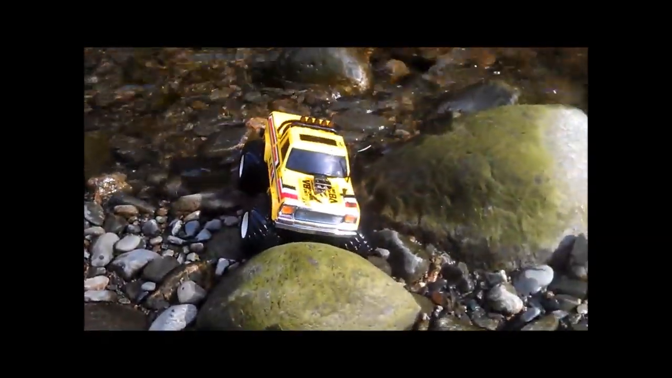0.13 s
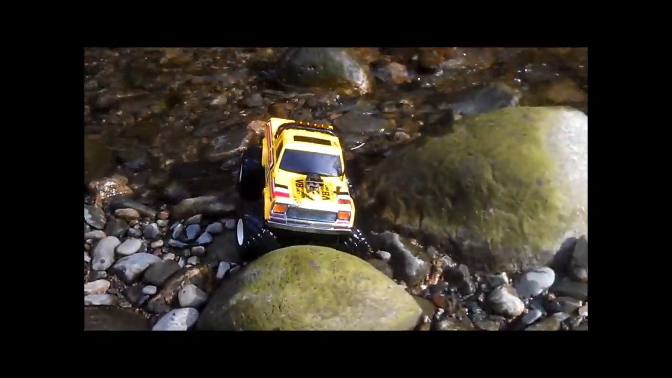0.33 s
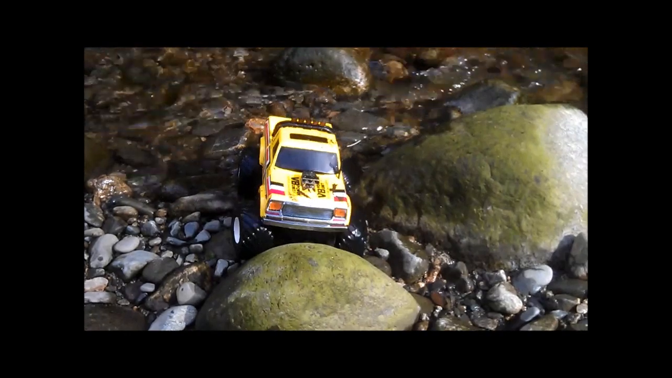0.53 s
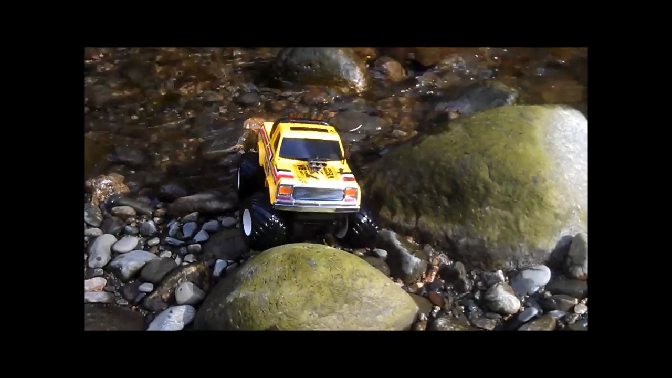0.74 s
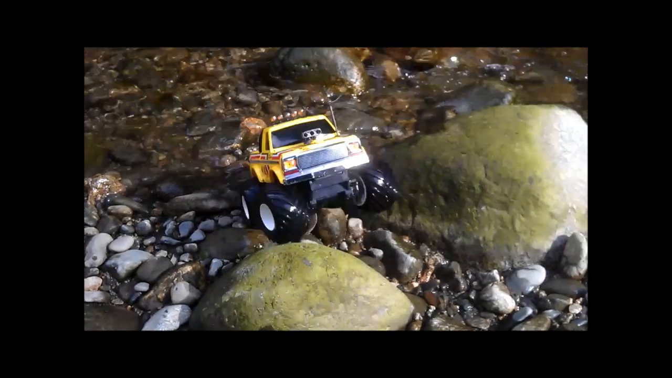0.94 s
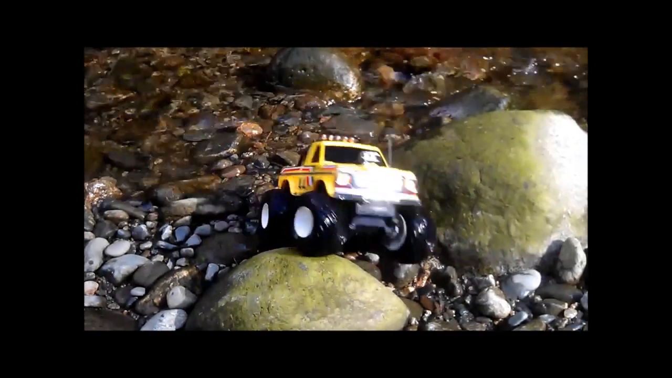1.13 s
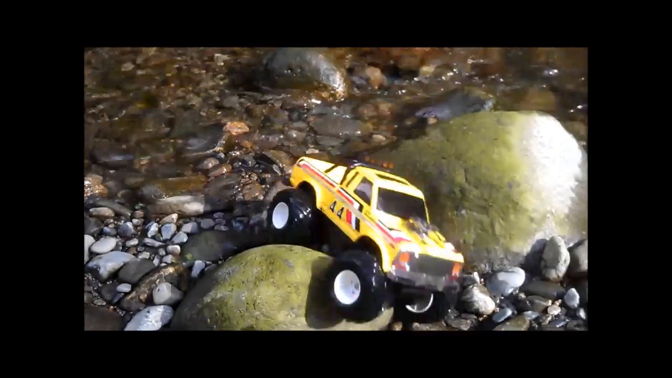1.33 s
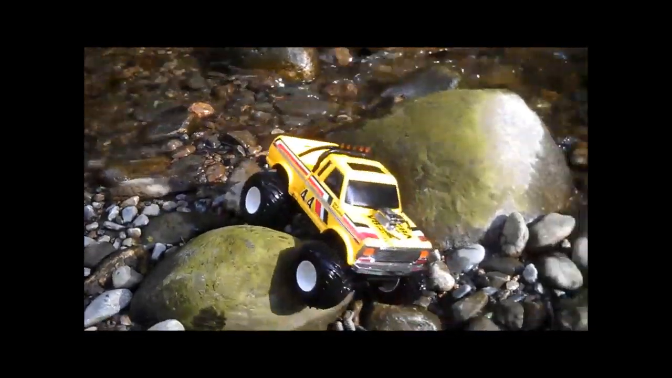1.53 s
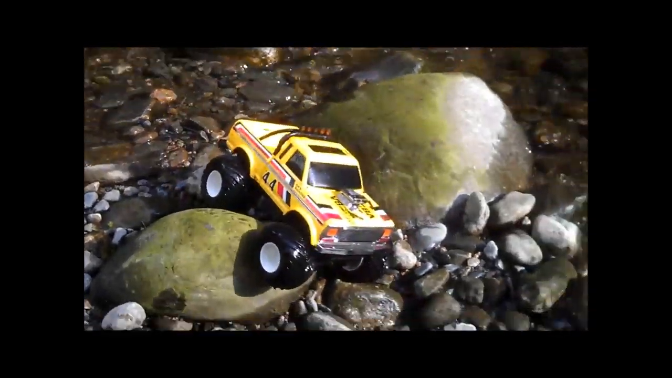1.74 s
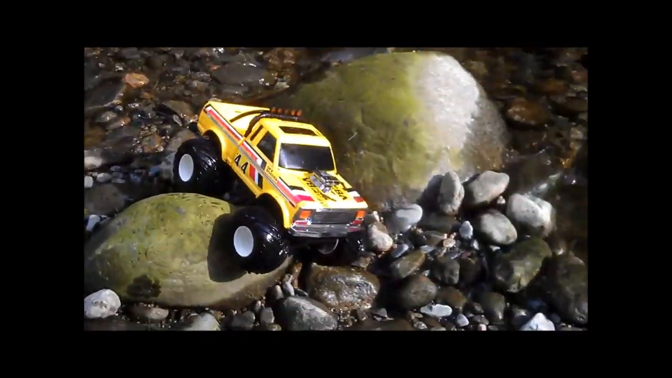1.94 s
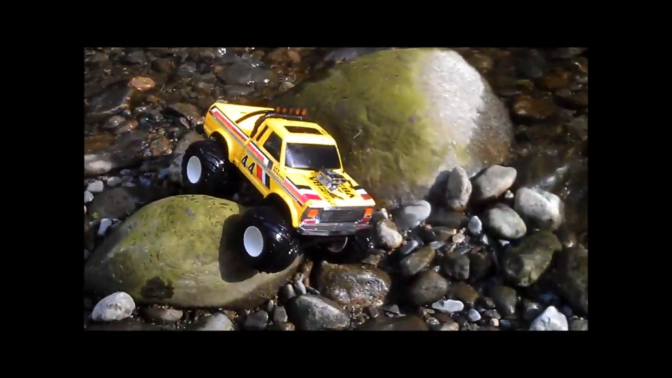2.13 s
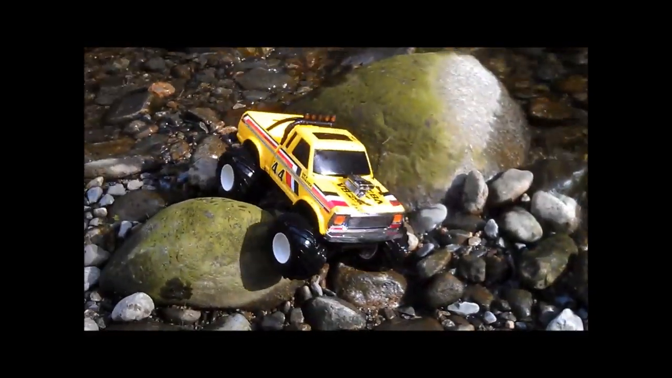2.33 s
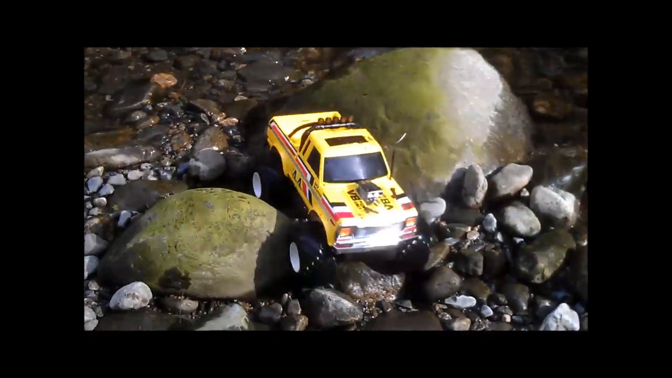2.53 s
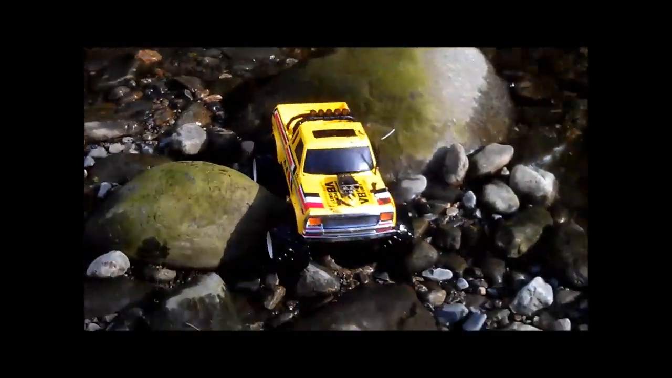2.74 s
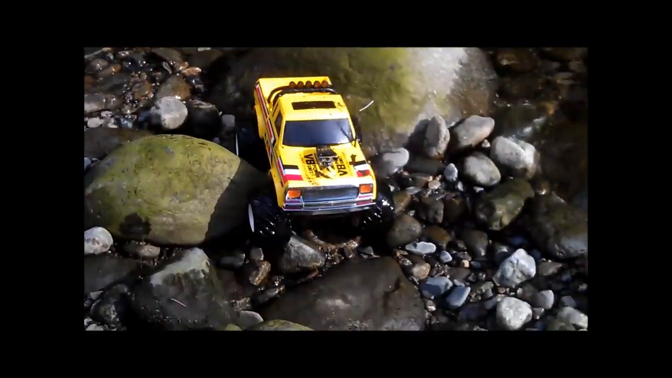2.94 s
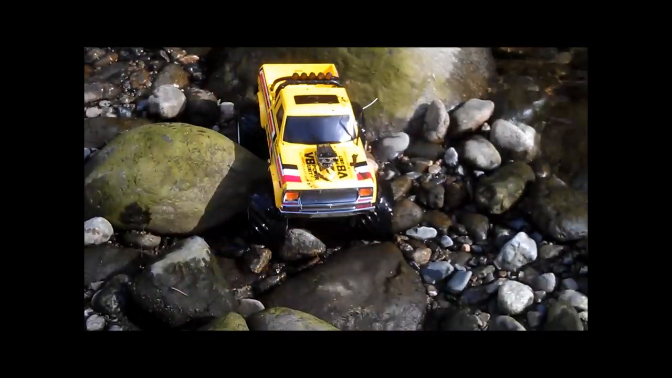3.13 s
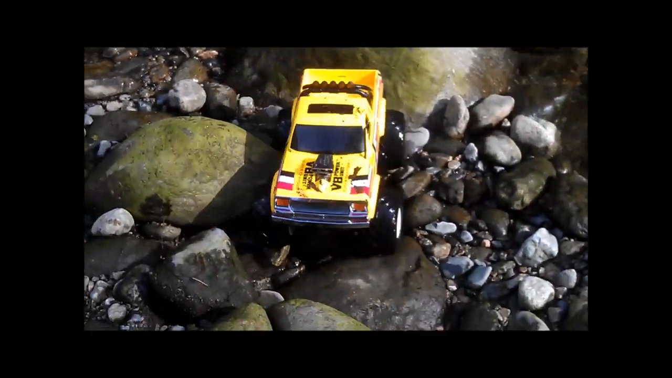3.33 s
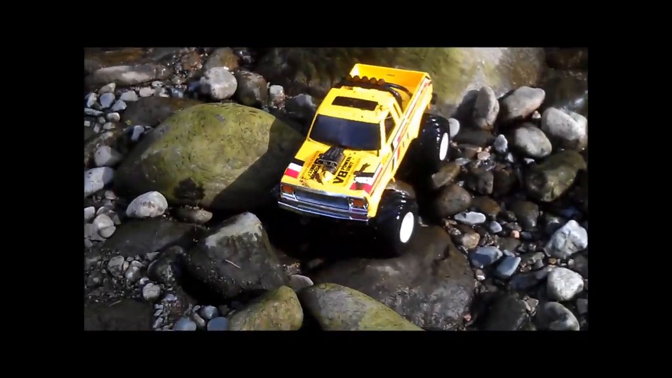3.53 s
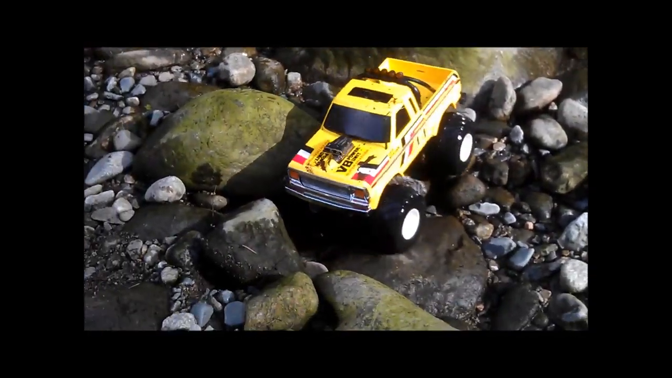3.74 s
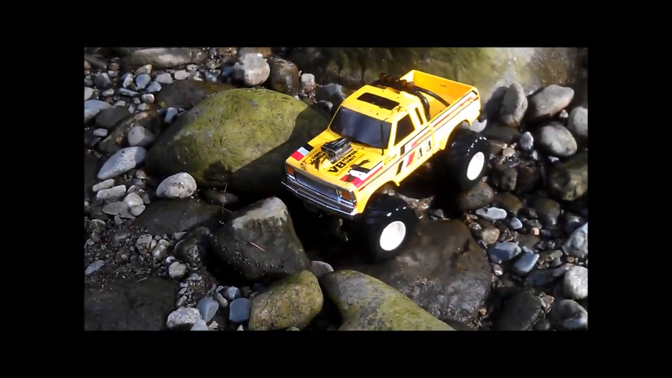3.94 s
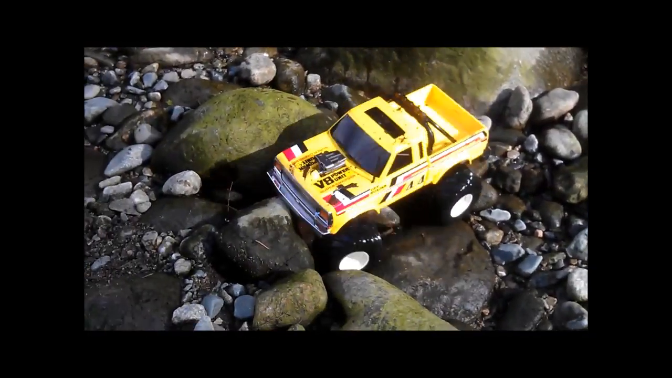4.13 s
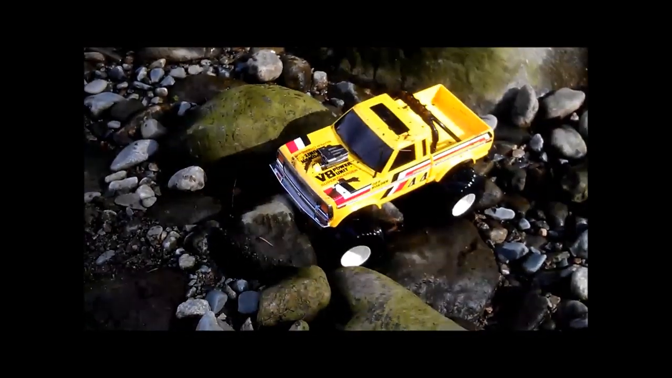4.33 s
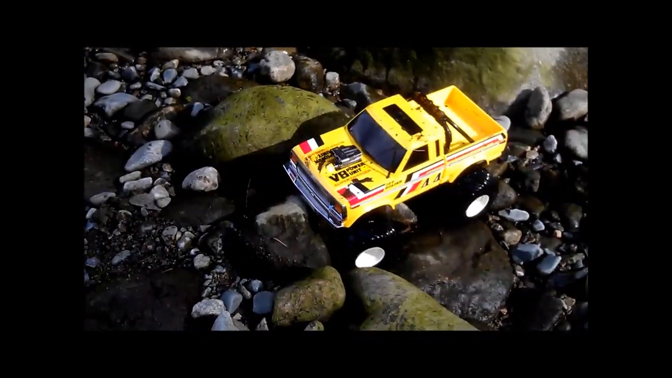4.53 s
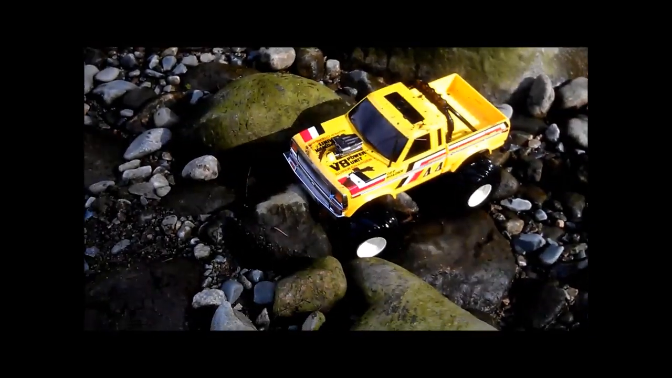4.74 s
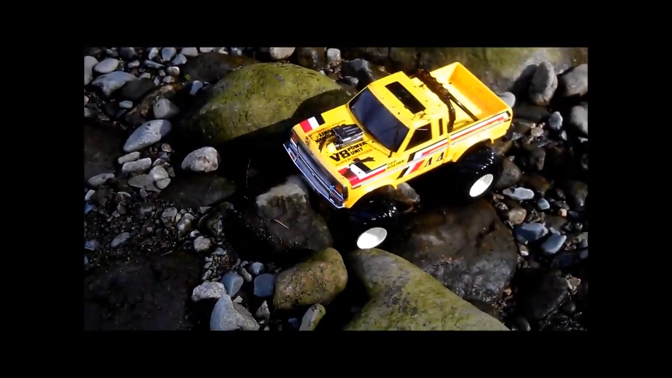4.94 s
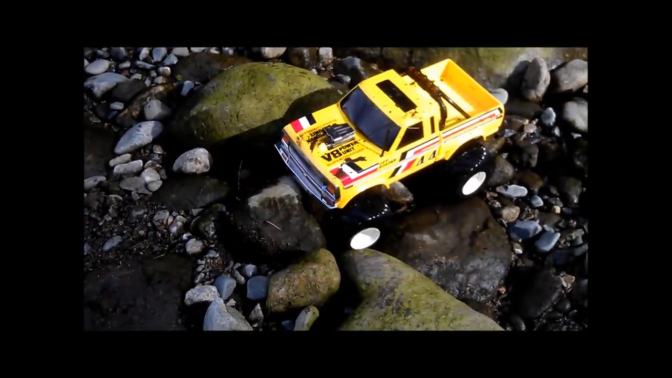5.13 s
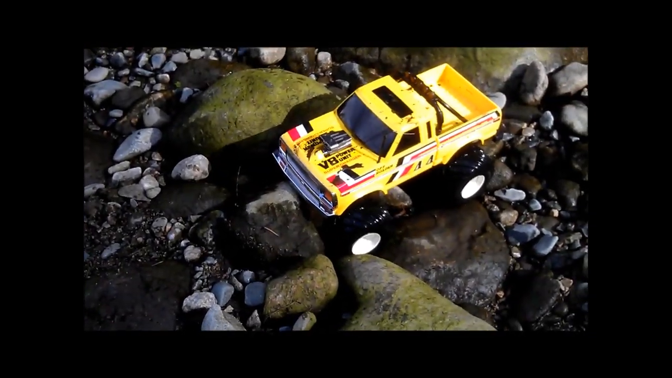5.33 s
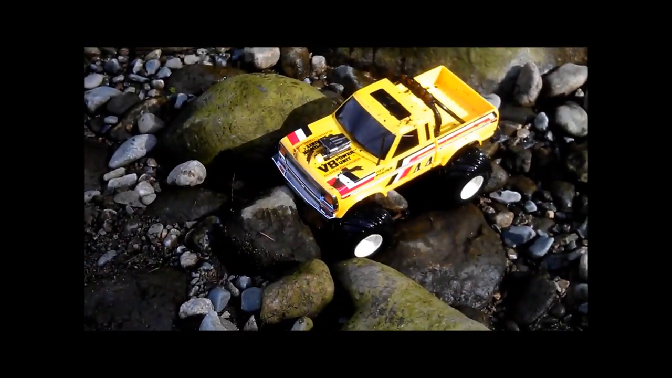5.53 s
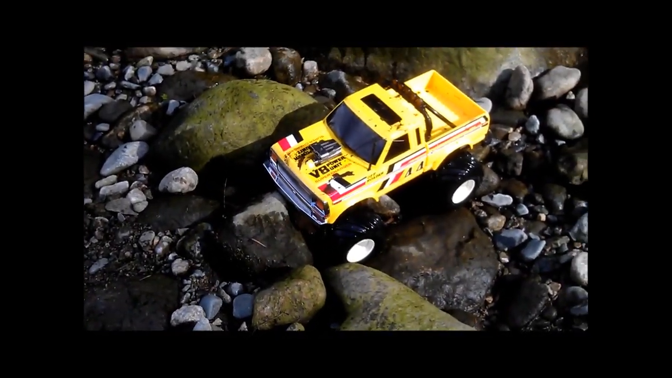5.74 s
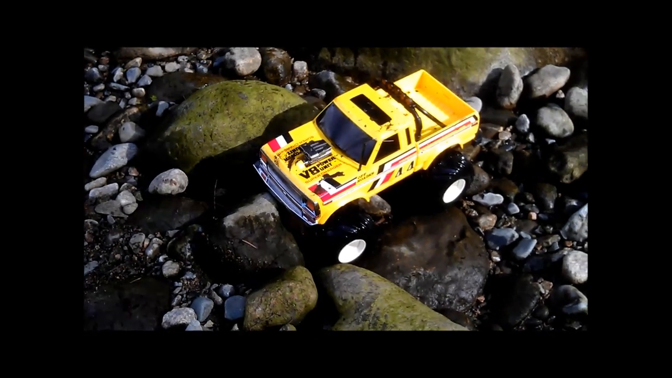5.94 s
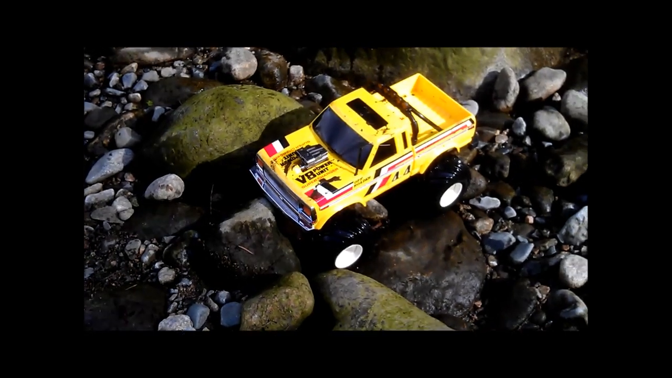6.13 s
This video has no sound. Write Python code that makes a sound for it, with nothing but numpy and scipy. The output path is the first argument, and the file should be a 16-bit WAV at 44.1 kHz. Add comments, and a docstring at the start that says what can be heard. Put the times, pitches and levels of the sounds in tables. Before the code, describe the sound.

Close stuttering gear whine and plastic rattle of a small radio-controlled truck, with stone knocks, brief pauses of creek water, and a squeak at the stop.

```python
"""Whining, rattling bursts of a toy crawler truck on wet stones, over a creek and far birds; stereo, close.
Gear teeth whine at the mesh rate, and their impacts ring the casing, cover and motor can in throbs.
Tyres scrabble as grainy noise and knock on stone as fading noise; a short gliding squeak marks the stop.
The creek is flickering bands of noise plus gliding bubbles; the birds are short near-sine slurs.
Creek, birds and squeak are heard fainter while the truck is loud."""
import sys
import numpy as np
from scipy import signal
from scipy.fft import rfft, irfft, next_fast_len
from scipy.io import wavfile
from scipy.ndimage import uniform_filter1d

SR = 44100
rng = np.random.default_rng(int(sys.argv[2]) if len(sys.argv) > 2 else 0)


def persist_wave(psi):
    """Save psi, clipped to +-1, as 16-bit WAV."""
    counts = np.round(np.clip(psi, -1, 1) * 32767).astype(np.int16)
    wavfile.write(sys.argv[1], SR, np.atleast_2d(counts).T)


N = 277389
T = np.arange(N) / SR
GEAR_TEETH, PINION_TEETH = 44, 13

# gear mesh, one table a pull of the throttle: time_s, mesh_hz, tooth_force_db,
# even_overtones_db and third_overtone_db (both over the tooth force)
MESH_PULLS = [
    [(.478, 1170, -14, -10, -13), (.51, 1284, -13, -16, -19), (.55, 1500, -17, -11, -21),
     (.595, 1330, -22, -30, -28), (.63, 1501, -24, -10, -20), (.68, 1500, -22.5, -10, -14),
     (.718, 1390, -27, -12, -16), (.77, 1569, -24, -5, -13.5), (.88, 1529, -22.5, -10, -15),
     (.95, 1721, -25.5, -6.5, -20), (1.01, 1750, -31.5, 6, -17), (1.07, 1814, -31, 0.5, -11),
     (1.15, 2030, -20.5, -12.5, -7), (1.215, 1936, -28.5, -9, -21)],
    [(1.255, 1800, -27, -5, -12), (1.292, 1380, -24.5, -5, -11)],
    [(1.33, 2200, -23, -11, -14), (1.352, 2020, -38.5, 3, -14), (1.366, 2207, -28, -15, -16),
     (1.395, 1870, -31, -3, -20)],
    [(2.35, 800, -29, 5, -17), (2.41, 1120, -23, 1.5, -3), (2.46, 1355, -26, -8, -29),
     (2.51, 1500, -22, -6, -14), (2.55, 1690, -25, -16, -20), (2.585, 1661, -18, -13, -16),
     (2.612, 1340, -20.5, -13, -7)],
    [(2.711, 1599, -9.5, -1, -17), (2.742, 1290, -24, -7, -9)],
    [(2.865, 1646, -29, -1, -14), (2.89, 1650, -20, -13, -19)],
    [(3.19, 1598, -16, -6, -24), (3.24, 1464, -27, -5, -8)],
    [(3.32, 1130, -33, 2, -6), (3.36, 1260, -21.5, -17, -2), (3.41, 1138, -31, -15, -15),
     (3.445, 1450, -31, 1, 0.5), (3.48, 1200, -25.5, -14, -1.5), (3.57, 1000, -30.5, -14, -14),
     (3.63, 800, -33.5, 4, -4), (3.7, 618.6, -30, -6, -18), (3.85, 636.4, -34.5, -6, 5),
     (3.97, 860, -37.5, -1.5, -8), (4.17, 860, -35.5, 7, -3), (4.27, 1252, -26.5, -5, -6)],
    [(4.315, 1724, -20, -21, -13), (4.37, 1400, -28, -2, -12), (4.49, 1310, -29, -4, -15),
     (4.55, 1201, -35.5, 5, -8), (4.6, 1099, -34, 1, -10), (4.66, 1048, -28, -2, -8),
     (4.77, 1015, -27, -4, -7), (4.84, 950, -32.5, 3, -3), (4.94, 900, -35, 9.5, 2),
     (5.0, 1040, -22.5, -4, -12), (5.05, 1331, -26.5, 0, -5.5), (5.12, 1611, -27, -18, -3),
     (5.17, 1800, -23, -16, -9), (5.2, 1885, -23, -3.5, -16), (5.29, 1986, -24.5, -10, -16),
     (5.37, 1450, -37, -18, -14)],
]
# how well the gearbox radiates a tone: pitch_hz, gain_db
GEARBOX_RADIATION = [(600, 2), (1000, -8), (1500, 0.5), (1780, -1.5), (2000, -0.5), (2400, 6), (3000, -11),
                     (3600, 0), (4050, 5), (4450, 3.5), (4850, -6.5), (5500, -3), (6200, -35)]
# motor tones at two and four thirds of the mesh rate: level_db over the tooth force
MOTOR_TONES_DB = [-9, -16]
FOURTH_DB = -14  # fourth overtone over the second


def whine(throb):
    """Tooth mesh tone with harmonics that blur the higher they lie, coloured by the gearbox."""
    (hz, force_db, even_db, third_db), on = played(MESH_PULLS)
    # slow, loaded teeth grind and flutter; fast, free ones sing
    clean = np.clip((hz - 850) / 950, .4, .85)
    rough = 1 - clean
    flutter = rough * (.022 * walk(40) + .03 * walk(200))
    turn = 2 * np.pi * np.cumsum(hz * (1 + flutter)) / SR
    noise = rng.standard_normal(N)

    mesh = 0.85 * np.sqrt(clean) * np.sin(turn) + 1.05 * rough * narrow(noise, turn, 140.)
    out = undb(2.5 * walk(60)) * mesh
    # an off-centre big gear swells the mesh tone once a turn
    out *= 1 + np.minimum(1.4 * rough, .45) * np.sin(turn / GEAR_TEETH + .8 * walk(12))

    second = 1.05 * clean ** 2 * np.sin(2 * turn)
    second += (1.05 - .6 * clean) * narrow(noise, 2 * turn, 220.)
    out += undb(even_db + 1.8 * walk(70)) * second
    third = .35 * clean * np.sin(3 * turn) + 1.05 * narrow(noise, 3 * turn, 330.)
    out += undb(third_db + 1.5 * walk(60)) * third
    out += undb(even_db + FOURTH_DB + 4 * walk(50)) * narrow(noise, 4 * turn, 260.)

    # the pinion chops tone and overtones into short beads
    out *= 1 + np.minimum(2.4 * rough, .7) * np.sin(turn / PINION_TEETH + 1.1 * walk(40))
    out = colour(out * undb(force_db), GEARBOX_RADIATION)

    # the motor tones hum loudest near one speed
    hum = 1 + np.exp(-((hz - 1780) / 110) ** 2)
    for thirds, db in zip((2, 4), MOTOR_TONES_DB):
        motor = np.sin(thirds / 3 * turn)
        out += undb(force_db + db + 2 * walk(70)) * clean ** 4 * motor * hum
    return out * throb ** .6 * on


# louder throbs of the gear train, many in a regular run: time_s, level_db (relative)
LOUD_THROBS = [(.434, -9), (0.45, 0), (0.48, -2.5), (0.504, -5.5), (0.529, -11.5), (0.587, -13),
               (0.778, -17), (0.806, -17), (.84, -15), (1.044, -10.5), (1.079, -12), (1.368, -16),
               (2.351, -12), (2.391, -2.5), (2.416, -4), (2.498, -9), (2.593, -7.5), (2.733, -5.5),
               (2.854, -8), (2.877, -8.5), (3.226, -4), (3.261, -5.5), (3.35, -11), (3.448, -8),
               (3.638, -10), (3.759, -11), (3.82, -10.5), (3.87, -10.5), (3.92, -6), (3.961, -9),
               (4.007, -10.5), (4.133, -10.5), (4.244, -7.5), (4.269, -6), (4.34, -7.5), (4.416, -7),
               (4.476, -7), (4.509, -6.5), (4.539, -10), (4.57, -9), (4.602, -12), (4.632, -12.5),
               (4.664, -12), (4.7, -11.5), (4.74, -11.5), (4.783, -9.5), (4.823, -10.5), (4.872, -14),
               (4.915, -10), (4.989, -5), (5.057, -7.5)]
# throb once a turn of the big gear, over the steady rattle
TIGHT_SPOT_DB, TIGHT_SCATTER_DB = 3.5, 1.


def throbbing(rest_db, mesh_hz):
    """Rattle envelope: swells at big-gear turns and at timed louder throbs, fast up and slower down."""
    gear_turns = np.cumsum(mesh_hz * (1 + 0.04 * walk(20))) / SR / GEAR_TEETH
    turns = np.flatnonzero(np.diff(np.floor(gear_turns)))
    powers = np.zeros(N)
    scatter_db = TIGHT_SCATTER_DB * rng.standard_normal(len(turns))
    powers[turns] = undb(rest_db[turns] + TIGHT_SPOT_DB + scatter_db) ** 2
    for s, db in LOUD_THROBS:
        i = int((s - .009) * SR)
        powers[i - 900:i + 900] = 0  # a louder throb replaces the swells that start within 20 ms of it
        powers[i] = undb(db - 10.0) ** 2
    u = np.arange(int(.05 * SR)) / SR / .014  # the swell peaks after 14 ms
    swell = (u * np.exp(1 - u)) ** 6
    swells = np.abs(signal.fftconvolve(powers, swell)[:N])
    return np.sqrt(undb(rest_db) ** 2 + swells)


# rings of the casing: pitch_hz, width_hz, level_db (relative)
CASING_RINGS = [(1930, 1000, -5), (2023, 110, -9), (2357, 132, -7.5), (4400, 100, -12), (9300, 100, -44)]
# rings of the motor can: pitch_hz, width_hz
CAN_RINGS = [(7350, 240), (7770, 300)]
# how hard the can rings: time_s, level_db (relative)
CAN_STRENGTH = [(.45, -16), (.6, -13), (1.05, -15), (1.2, -24), (3.0, -20), (3.25, -19), (3.75, -20),
                (3.9, -12.5), (4.9, -14), (5.15, -5.5), (5.35, -12)]
# ring of the gear cover: time_s, pitch_hz, level_db (relative)
COVER_RING = [(.5, 3830, -9), (.59, 3830, -4.5), (.63, 3940, -9), (.9, 3850, -16), (1.3, 3860, -21),
              (1.37, 3750, -4), (1.42, 3900, -66), (2.33, 3680, -27), (2.355, 3647, -10), (2.75, 3690, -29),
              (3.25, 3810, -10), (3.4, 3810, -12), (3.52, 3740, -14), (3.58, 3795, -14),
              (3.72, 3820, -16.5), (4., 3830, -7.5), (4.55, 3904, -12), (4.62, 3910, -13), (4.7, 3920, -8),
              (4.88, 3887, -21), (5.04, 3900, -15.5), (5.16, 3808, -23), (5.4, 3900, -13),
              (5.44, 3900, -39)]
# broad hiss of the tooth impacts: pitch_hz, level_db (relative, per Hz)
IMPACT_HISS = [(1500, -65), (2500, -12), (4500, -11), (6500, -22), (9000, -24.5), (12000, -40.5),
               (15500, -114)]
LABOUR_DB_PER_KHZ = 4  # the casing rings harder as the gears slow under load
BRUSH_SPLIT_HZ, BRUSH_DB = 8760, 5.5  # lift of brush hiss and high rings above the split


def gearbox_rattle(env, throb, mesh_hz):
    """Tooth impacts ring the casing, motor can and gear cover over a broad hiss."""
    hits = grainy(.7, 900) * undb(1.5) * env
    ring = sum(undb(db) * band(hits, f - w / 2, f + w / 2) for f, w, db in CASING_RINGS)
    ring *= undb(LABOUR_DB_PER_KHZ * (1500 - mesh_hz) / 1000)
    can = sum(band(hits, f - w / 2, f + w / 2) for f, w in CAN_RINGS)
    ring += undb(np.interp(T, *np.transpose(CAN_STRENGTH))) * throb ** 0.85 * can
    # the gear cover flexes under load, so its ring shifts and breaks up
    (cover_hz, cover_db), _ = played([COVER_RING])
    turn = 2 * np.pi * np.cumsum(cover_hz * (1 + .007 * walk(90))) / SR
    cover = undb(cover_db + 1.5 * walk(50)) * throb ** .7 * narrow(hits, turn, 210.0)
    rattle = undb(2.5) * ring + cover + undb(7.5) * colour(hits, IMPACT_HISS)
    return rattle + (undb(BRUSH_DB) - 1) * band(rattle, BRUSH_SPLIT_HZ, 21000.0)


# tyre scrabble: pitch_hz, level_db (relative, per Hz)
TYRE_GRIT = [(50, -50), (120, -19.5), (250, -0.5), (500, 0.5), (800, 8.5), (1600, 4.5), (2500, -2.5),
             (4000, -45)]


def tyre_scrabble(grit_db, throb):
    """Tyres scrape wet stone: grainy noise that throbs slightly with the gears."""
    grit = level(colour(grainy(0.36, 500), TYRE_GRIT), -7.5)
    return grit * undb(grit_db) * throb ** 0.16


# load on the truck, one table a burst: time_s, steady_rattle_db, tyre_scrabble_db (both relative)
LOAD_BURSTS = [
    [(.38, -38, -36), (.44, -17, -15.5), (.594, -31, -35.5), (.93, -29.5, -32.5), (1.072, -23, -33),
     (1.194, -28.5, -33), (1.235, -30, -33)],
    [(1.245, -23.5, -27), (1.285, -30, -32), (1.305, -40, -37), (1.33, -28, -25), (1.5, -29.5, -25.5),
     (1.6, -32, -26.5), (2.1, -44, -35)],
    [(2.3, -46, -31), (2.36, -15.5, -19), (2.46, -22.5, -22), (2.52, -26, -27), (2.588, -20.5, -24.5),
     (2.635, -30, -35), (2.655, -48, -31), (2.685, -29, -28.5), (2.71, -30, -25), (2.93, -31, -31.5),
     (3.05, -44, -33)],
    [(3.12, -38, -32), (3.19, -17.5, -13.5), (3.35, -25, -27.5), (3.57, -28.5, -28.5), (3.84, -21.5, -21),
     (4.02, -24.5, -29), (4.8, -26, -32.5), (5.03, -22.5, -25.5), (5.12, -22.5, -36), (5.2, -24, -32.5),
     (5.31, -25.5, -41), (5.39, -39, -32)],
    [(5.43, -46, -51), (5.472, -26, -31.5), (5.62, -65, -32.5)],
]
TRUCK_PAN_DB = -1.5  # left over right


def truck():
    """Gear whine, gearbox rattle and tyre scrabble, burst by burst, slightly right of centre."""
    (rest_db, grit_db), on = played(LOAD_BURSTS)
    mesh_hz = played(MESH_PULLS)[0][0]
    env = throbbing(rest_db, mesh_hz)
    throb = env / uniform_filter1d(env, size=3000)
    rough = gearbox_rattle(env, throb, mesh_hz) + tyre_scrabble(grit_db, throb)
    sound = whine(throb) + rough * on
    return wide(sound, 0.98) * undb(np.array([[TRUCK_PAN_DB], [-TRUCK_PAN_DB]]) / 2)


# bumps of tyres and chassis on stone: start_s, level_db (relative), treble_db (crack over thud)
STONE_KNOCKS = [(0.45, -8, -3), (1.25, -30, -11), (1.456, -11.5, -8), (1.491, -30, -7),
                (1.517, -18.5, -4.5), (2.366, -7.5, -5), (2.71, -21.5, 0), (2.852, -10.5, -46),
                (2.913, -11.5, -11), (3.186, -7.5, -9), (3.702, -30, -20), (4.277, -19.5, -6),
                (5.487, -10.5, -3)]
# dull thud of the stones: pitch_hz, level_db (relative, per Hz)
STONE_THUD = [(40, 0), (120, -10), (400, 2), (900, 5.5), (1600, 3.5), (3000, -40)]
KNOCK_T60_S = 0.24


def knocks():
    """Each bump is a dull thud and a bright crack of noise, fading exponentially."""
    low, high = np.zeros(N), np.zeros(N)
    t = np.arange(int(.2 * SR)) / SR
    for s, db, treble_db in STONE_KNOCKS:
        i = int(s * SR)
        fade = (1 - np.exp(-t / 0.0012)) * undb(db - 12.5 - 60 * t / KNOCK_T60_S)
        low[i:i + len(t)] += fade
        high[i:i + len(t)] += fade * undb(treble_db)
    thud = level(colour(rng.standard_normal(N), STONE_THUD), 0) * low
    crack = level(band(rng.standard_normal(N), 2540.0, 9050.0), 0) * high
    return wide(thud, 0.87) + wide(crack, 0.73)


# squeak and bird slurs: start_s, length_s, pitch_hz, glide_octaves, level_db (relative)
SLURS = [(0.108, 0.031, 5480, -0.043, -39), (0.229, 0.048, 6950, 0., -45), (0.314, 0.025, 5600, .28, -45),
         (1.59, 0.029, 5350, 0.088, -36), (1.701, 0.078, 4480, -0.033, -52),
         (1.77, 0.047, 4930, 0.43, -38.5), (2.67, 0.067, 7100, -0.032, -32),
         (3.019, 0.16, 7970, -0.077, -89), (5.483, 0.03, 5230, -0.08, -24.5),
         (5.556, 0.056, 5670, -0.15, -37), (5.628, 0.034, 7100, -.1, -45), (5.819, .012, 4500, 0., -37.5),
         (5.852, 0.014, 4720, -0.2, -43), (5.88, .016, 4080, -0.027, -45),
         (5.899, 0.015, 4820, -0.22, -41.5), (5.935, 0.01, 4250, .24, -42), (6.072, 0.058, 7500, 0.11, -47),
         (6.2, 0.041, 5220, 0.22, -45)]
# the one short squeak as the truck stops, at 5.48 s: same columns
STOP_SQUEAK = SLURS[8:9]


def squeak():
    """A short squeak as the truck stops: one near-sine slur gliding slightly down."""
    return slurred(STOP_SQUEAK)


# rush of the creek: pitch_hz, level_db (relative, per Hz)
CREEK_RUSH = [(15, -81), (25, -51), (66, -106), (136, -37), (183, -5.5), (495, -6), (762, 0), (1080, -1.5),
              (1570, -8), (1850, -6), (3090, -13.5), (5580, -16), (9810, -21), (12500, -32.5),
              (15500, -126)]
# how alike the creek is on the two sides: pitch_hz, likeness (0 to 1)
SIDE_LIKENESS = [(60, .6), (130, 1), (300, 0.92), (700, 1), (1400, 0.1), (3000, 0.19), (15000, 0.2)]
CREEK_DB = -43  # rush at 200-450 Hz, before the ducking and the microphone


def creek():
    """Rush in flickering half-octave noise bands, bass alike on both sides, with gurgling bubbles."""
    rush, swell = 0, walk(1.0)
    for hz in 40 * 2 ** np.arange(1, 8.6, .5):
        mid, side = (band(grainy(0.76, 700), hz * 0.77, hz * 1.16) for _ in range(2))
        alike = np.clip(along(SIDE_LIKENESS, hz), 0, .99)
        gain = undb(0.2 * swell + 1.5 * walk(5.5))
        spread = np.sqrt(1 - alike) * side * np.array([[1], [-1]])
        rush = rush + gain * (np.sqrt(1 + alike) * mid + spread)
    rush = colour(rush, CREEK_RUSH)
    rush = rush / np.sqrt(np.mean(band(rush.mean(axis=0), 200., 450.) ** 2))
    bubbles = np.zeros(N + SR)
    for when, pitch, size in rng.random((900, 3)):
        hz, i = 500 * 2 ** (1.4 * pitch), int(when * N)
        t = np.arange(int(12 / hz * SR)) / SR
        # a bubble rings a few cycles and glides up
        tone = np.sin(2 * np.pi * hz * t * (1 + 0.0241 * hz * t))
        bubbles[i:i + len(t)] += undb(-14 * size) * np.exp(-t * hz / 5.4) * tone
    return (rush + wide(level(bubbles[:N], 0.32), 0.37)) * undb(CREEK_DB)


# far birds, all the slurs but the squeak: start_s, length_s, pitch_hz, glide_octaves, level_db (relative)
BIRD_NOTES = SLURS[:8] + SLURS[9:]


def birds():
    """Far birds twitter in short near-sine slurs, most gliding through their pitch."""
    return slurred(BIRD_NOTES)


def slurred(notes):
    """Near-sine slurs under rounded envelopes, with a fluttering level."""
    out = np.zeros(N)
    for s, length, hz, octaves, db in notes:
        i, u = int(s * SR), np.linspace(-1, 1, int(length * SR))
        tone = np.sin(2 * np.pi * np.cumsum(hz * 2 ** (octaves * u / 2)) / SR)
        out[i:i + len(u)] += undb(db) * np.sqrt(1 - u ** 2) * tone
    return wide(out * undb(4.5 * walk(400)), .8)


def ducking(loud, knee_db, depth, hold_s):
    """Background gain: falls with the recent power of the loud sound, recovers when that stops."""
    keep = np.exp(-1 / (hold_s * SR))
    power = signal.lfilter([1 - keep], [1, -keep], np.mean(loud ** 2, axis=0))
    return (1 + power / undb(2 * knee_db)) ** -depth


def wide(x, share):
    """Stones and water scatter a share of the sound differently to each side, the treble most."""
    taps = rng.standard_normal(3000) * np.exp(-np.arange(3000) / 1000.)
    taps = signal.lfilter([1, -.6], [1], taps)
    side = share * signal.fftconvolve(x, taps / np.sqrt(np.sum(taps ** 2)))[:N]
    return np.array([x + side, x - side])


def narrow(x, turn, width_hz):
    """Noise squeezed into a line that follows the phase turn; rms near 1 for white x of rms 1."""
    sos = signal.butter(2, width_hz / 2, fs=SR, output="sos")
    slow = signal.sosfilt(sos, x * np.exp(-1j * turn)) * np.sqrt(SR / width_hz)
    return np.real(slow * np.exp(1j * turn))


def grainy(spike_db, per_s):
    """Noise whose loudness jumps grain by grain."""
    k = int(SR / per_s)
    sizes = undb(spike_db * rng.exponential(size=N // k + 1))
    return rng.standard_normal(N) * np.repeat(sizes, k)[:N]


def walk(rate):
    """Random levels held 1 / rate s and slewed twice; spread near 1."""
    k = int(SR / rate)
    steps = np.repeat(rng.standard_normal(N // k + 1), k)
    return 1.6 * uniform_filter1d(uniform_filter1d(steps, k), k)[:N]


def played(tables):
    """Columns of several tables sample by sample, and a gate that is open inside them."""
    rows = np.concatenate([np.array(table) for table in tables])
    on = sum((T > table[0][0]) & (T < table[-1][0]) for table in tables)
    return [np.interp(T, rows[:, 0], c) for c in rows.T[1:]], uniform_filter1d(1. * on, size=800)


def colour(x, table):
    """Shape a signal by (Hz, dB) points."""
    size = next_fast_len(N)
    gains = undb(along(table, np.fft.rfftfreq(size, 1 / SR)))
    return irfft(rfft(x, size) * gains, size)[..., :N]


def along(table, hz):
    """Value of (Hz, value) points on a log-frequency axis."""
    f, v = np.transpose(table)
    return np.interp(np.log(hz + 1), np.log(f), v)


def band(x, lo_hz, hi_hz):
    """Keep the part of a sound between two frequencies."""
    edges = [lo_hz, min(hi_hz, .45 * SR)]
    return signal.sosfilt(signal.butter(2, edges, "band", fs=SR, output="sos"), x)


def level(x, db):
    """Scale a signal to an rms level in dB."""
    return x * undb(db) / np.sqrt(np.mean(x ** 2))


def undb(db):
    """Amplitude factor of a level in dB."""
    return 10 ** (np.asarray(db) / 20)


def scene():
    """The truck and its knocks up close, over the ducked squeak, creek and birds."""
    near = truck()
    faint = squeak() + creek() + birds()
    return near + knocks() + ducking(near, knee_db=-33, depth=.8, hold_s=.05) * faint


# left-right balance by pitch, lows leaning left: pitch_hz, left_over_right_db (each side takes half)
SIDE_BALANCE = [(250, 0.6), (700, 3), (1200, 0.1), (12000, -0.5)]
TOP_HZ = 15720


def record(dry):
    """A stereo microphone: sides balanced by pitch, loud peaks rounded, bass thinned, top cut."""
    pair = [colour(x, np.array(SIDE_BALANCE) * [1, side / 2]) for x, side in zip(dry, (1, -1))]
    rounded = np.tanh(5.2 * np.array(pair)) / 4.
    thin = signal.sosfilt(signal.butter(4, 105., "high", fs=SR, output="sos"), rounded)
    return signal.sosfilt(signal.ellip(12, .2, 70, TOP_HZ, fs=SR, output="sos"), thin)


dry = scene()
out = record(dry)
persist_wave(out)
```